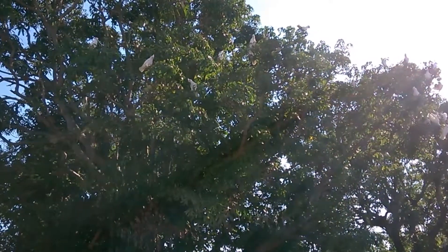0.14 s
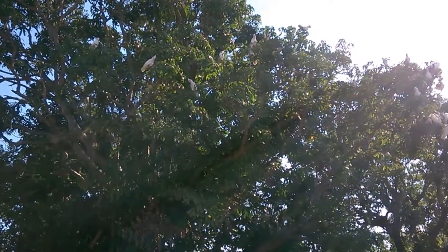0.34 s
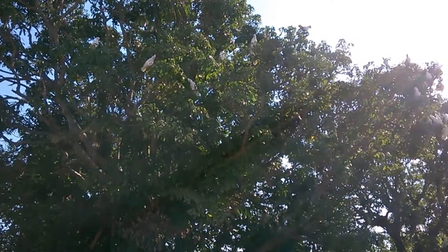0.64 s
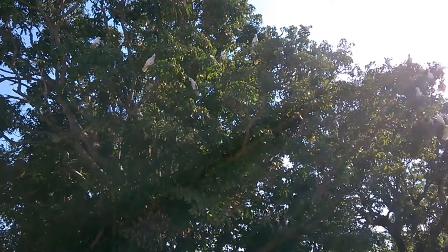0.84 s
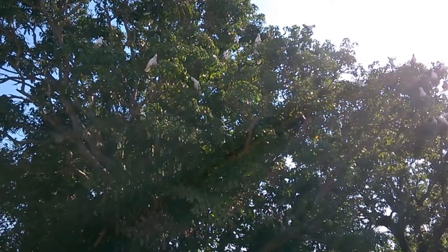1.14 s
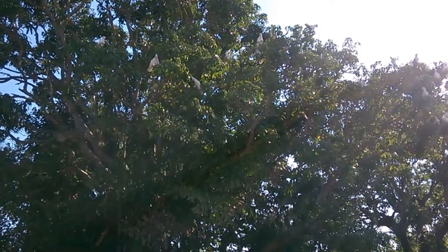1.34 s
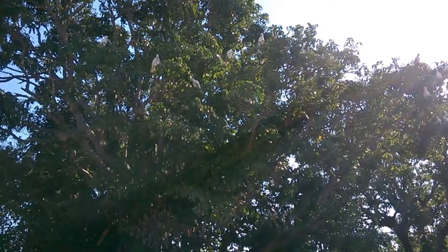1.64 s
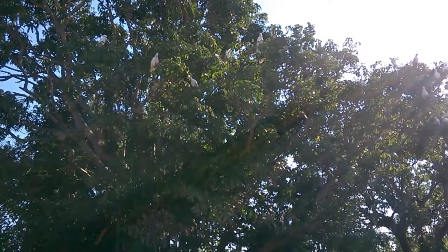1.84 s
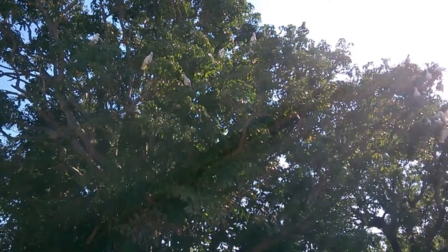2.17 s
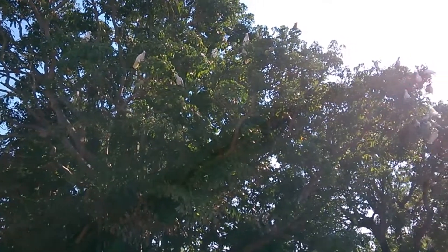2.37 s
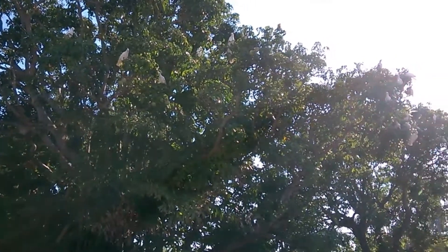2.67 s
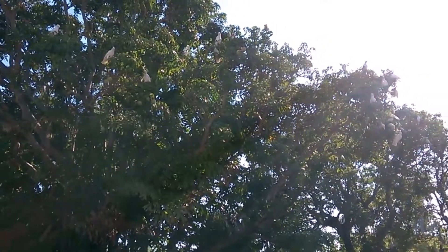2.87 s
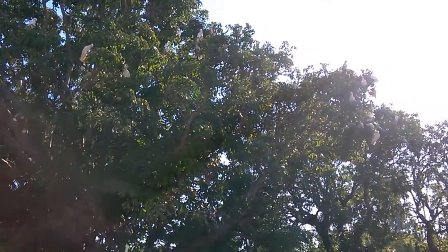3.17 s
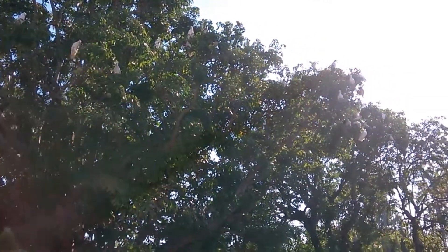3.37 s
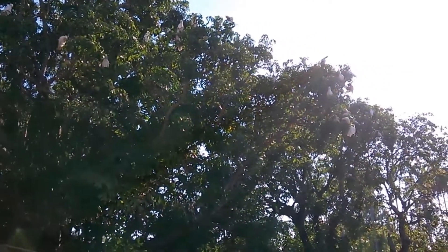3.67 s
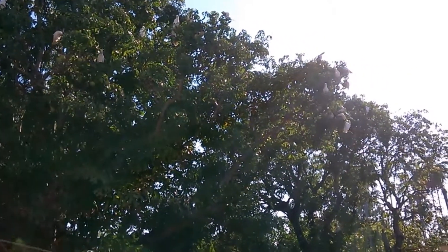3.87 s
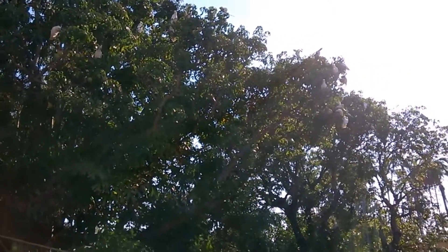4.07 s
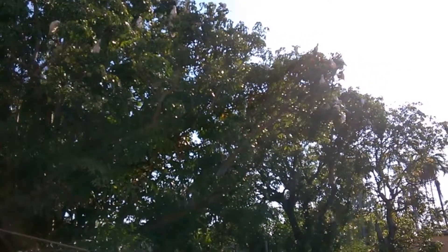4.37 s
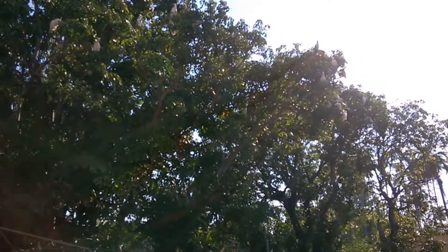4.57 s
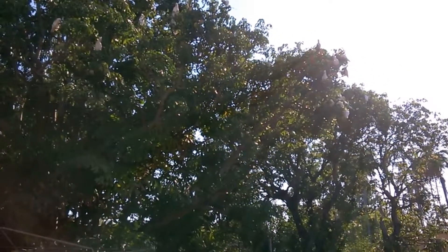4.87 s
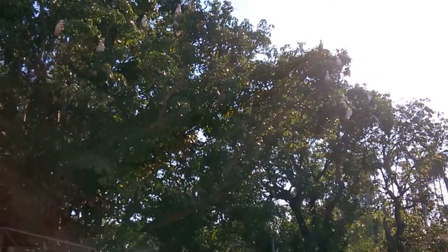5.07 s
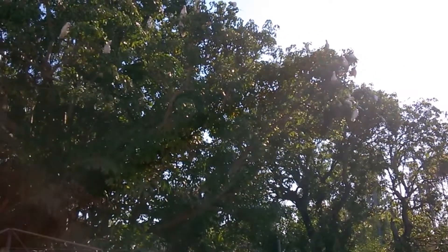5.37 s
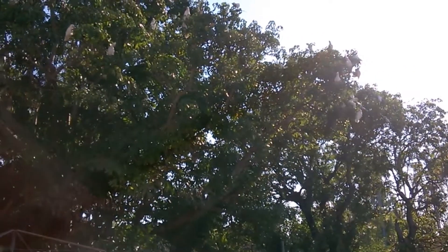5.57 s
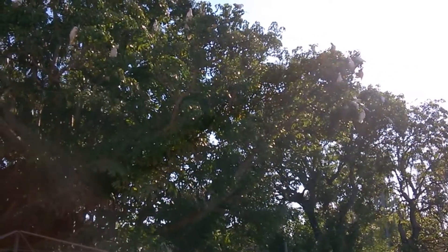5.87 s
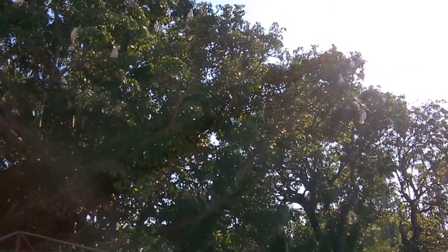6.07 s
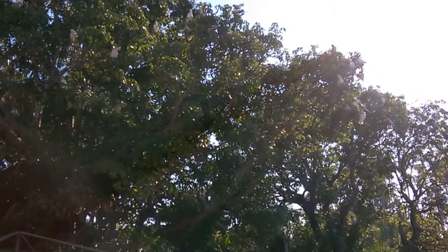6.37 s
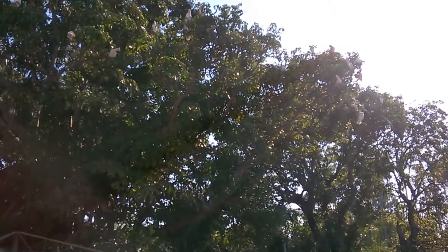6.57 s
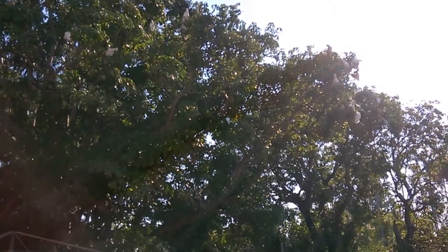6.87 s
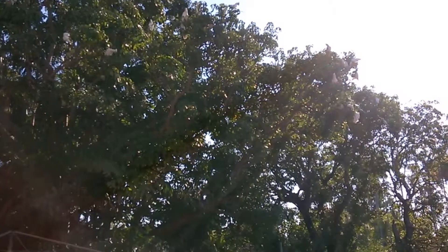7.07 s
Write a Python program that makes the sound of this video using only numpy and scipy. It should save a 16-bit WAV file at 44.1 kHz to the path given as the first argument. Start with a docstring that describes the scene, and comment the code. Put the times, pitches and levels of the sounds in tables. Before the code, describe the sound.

Outdoors among tall trees, wind rumbles low on the microphone while a distant engine drones and faint birds call far off. About three seconds in, a nearby cockatoo gives a short, hoarse screech, then a louder one a second later, each wavering in pitch and echoing briefly through the foliage. The engine hum slowly sinks and fades under a soft hiss of leaves and distant traffic.

```python
"""A cockatoo screeches twice from a tall tree: a membrane chops its breath into harsh harmonics,
the throat colours them, leaves and trunks scatter them back. Each screech is hoarse throughout,
swoops three times, swells and gains a slight undertone. Faint calls sound from further off.
Below, an engine drones and slowly drops in pitch, low hums come and go, wind rumbles on the
microphone, and swells from distant traffic and far birds pass under a hiss of leaves."""
import sys
import numpy as np
from scipy import signal
from scipy.fft import rfft, irfft
from scipy.io import wavfile
from scipy.ndimage import uniform_filter1d

SR = 44100
rng = np.random.default_rng(int(sys.argv[2]) if len(sys.argv) > 2 else 0)


def generate_wav(signal):
    """Clip the signal to [-1, 1] and save it as 16-bit WAV at the path in sys.argv[1]."""
    frames = np.transpose(np.atleast_2d(signal))
    scaled = np.clip(frames, -1, 1) * 32767
    pcm = np.round(scaled).astype(np.int16)
    wavfile.write(sys.argv[1], SR, pcm)


N = 318534


def cockatoo(attack_s=.018, attack_db=15.5, crescendo_s=.12, release_s=.038, release_db=17.5):
    """Two near, hoarse screeches: each opens dull, swells and gains a slight undertone."""
    # start_s, end_s, level_db, crescendo_db, early_roughness, late_roughness, tilt_db_per_oct,
    # shut_beak_db_per_oct, beak_opening_s, gape_shift_ratio, second_harmonic_db
    screeches = [(2.91, 3.15, -21.5, 9.9, 0.57, 0.6, 1.3, -14.5, 0.033, 0.032, 1),
                 (4.097, 4.377, -17, 7, 0.36, 0.3, 0.89, -7, 0.027, 0.0024, -2.5)]
    undertone_after_s, undertone_rise_s = .105, .015
    top_after_s, top_rise_s = .06, .027
    t = np.arange(N) / SR
    hz, height, push, flipping, accent_db, accent_tilt = warble()
    sounding, db, rough, doubling, beak_tilt, muffled, gape, second_db = np.zeros((8, N))
    for (start, end, level_db, crescendo_db, early_rough, late_rough,
         tilt, shut_tilt, opening_s, gape_shift, harmonic_db) in screeches:
        age = t - start
        near = np.abs(t - np.clip(t, start, end)) < .1
        late = near * ramp((age - undertone_after_s) / undertone_rise_s)
        sounding += (t > start) & (t < end)
        gape += near * gape_shift
        second_db += near * harmonic_db
        onset_db = attack_db * ramp(1 - age / attack_s) + crescendo_db * ramp(1 - age / crescendo_s)
        db += near * (level_db - onset_db - release_db * ramp(1 - (end - t) / release_s))
        rough += near * early_rough + (late_rough - early_rough) * late
        doubling += .3 * late_rough * late * (1 - height)
        beak_tilt += near * (tilt + shut_tilt * ramp(1 - age / opening_s))
        muffled += near * ramp(1 - (age - top_after_s) / top_rise_s)
    brightness = 1 - .5 * height + beak_tilt + accent_tilt  # duller on the crests
    trembling_hz = hz * (1 + .003 * wobble(70))
    rough += .17 * flipping
    voice = syrinx(trembling_hz, db + accent_db, rough, brightness, push, doubling, gape, second_db)
    # treble above 7 kHz, muted at the start of each screech: freq_hz, gain_db
    top_band = [(7200, 0), (12000, 0)]
    voice -= muffled * colour(voice, top_band)
    return voice * ring(hz) * uniform_filter1d(sounding, size=200)


def warble(crest_half_s=.012, bowl_share=.8, rise_power=1.35, fall_power=1.9):
    """The voice flips up onto each crest and sags in a bowl between, falling faster than it rises."""
    # three swoops a screech: crest_s, crest_hz, dip_s, dip_hz
    swoops = [(2.929, 812, 2.974, 712), (3.014, 803, 3.056, 652), (3.108, 740, 3.145, 730),
              (4.111, 800, 4.140, 655), (4.205, 813, 4.262, 684), (4.325, 793, 4.37, 776)]
    # push on each crest: accent_db, tilt_db_per_oct
    accents = [(-2, -3.5), (5, -2.5), (1, 0), (-2, -1.5), (4, 2), (1, 1.5)]
    t = np.arange(N) / SR
    crest_s, crest_hz, dip_s, dip_hz = np.transpose(swoops)
    crest = np.minimum(np.searchsorted(dip_s, t), len(swoops) - 1)
    dip = np.maximum(np.searchsorted(crest_s, t) - 1, 0)
    away_s = np.abs(t - crest_s[crest])
    flip = 1 / (1 + (away_s / crest_half_s) ** 6)
    power = np.where(t < crest_s[crest], rise_power, fall_power)
    bowl = bowl_share * ramp(1 - away_s / np.abs(dip_s[dip] - crest_s[crest])) ** power
    height = flip + (1 - flip) * bowl
    hz = dip_hz[dip] + (crest_hz[crest] - dip_hz[dip]) * height
    push = flip * (crest % 3 == 1)  # the middle crest is hardest
    flipping = np.sin(np.pi * flip)
    accent_db, accent_tilt = np.array(accents)[crest].T * flip
    return hz, height, push, flipping, accent_db, accent_tilt


def syrinx(hz, db, rough, tilt_db_per_oct, push, doubling, gape, second_db, harmonics=14):
    """A membrane beats in slightly uneven cycles and chops the air stream; the throat colours both."""
    pitch_hz = hz * (1 + .013 * rough * wobble(200))
    phase = 2 * np.pi * np.cumsum(pitch_hz) / SR
    # beats shut early or late, blurring the top harmonics into rasp
    beat = phase + .11 * rough * wobble(350)
    grid_hz = np.arange(N // 2 + 1) * SR / N
    relaxed, pushed = throat(grid_hz), throat(grid_hz, push=.93)
    tone, power = 0, 0
    for k in range(1, harmonics + 1):
        tilt_db = tilt_db_per_oct * np.log2(np.minimum(k * hz, 4500) / 2500)
        edge_db = 1.2 * (db + 15) * np.clip((k * hz - 6000) / 1500, 0, 1.5)  # top follows the level
        flicker_db = 2.8 * wobble(30)
        # a wider gape raises only the beak's resonances, above 3 kHz
        lookup_hz = k * hz / (1 + gape * ramp((k * hz - 3000) / 1000))
        passed = (1 - push) * np.interp(lookup_hz, grid_hz, relaxed)
        passed += push * np.interp(lookup_hz, grid_hz, pushed)
        weight = passed * undb(tilt_db + edge_db + flicker_db + (k == 2) * second_db)
        dispersion = 2 * np.pi * k * k / harmonics  # windpipe delays spread each beat
        tone += weight * np.cos(k * beat + dispersion)
        power += weight ** 2 / 2
    chopped = rng.standard_normal(N) * (1 + np.cos(phase))
    air_gain = relaxed * undb(2.5 * np.log2(np.clip(grid_hz, 500, 5500) / 2500))
    air = unit(irfft(rfft(chopped) * air_gain, N))
    # strain shakes the beats; doubling makes them alternately strong and weak
    flutter = 1 + .3 * rough * wobble(300) + 2 * doubling * np.cos(phase / 2)
    rasp = .38 * rough
    return undb(db) * (tone / np.sqrt(power) * flutter + rasp * air) / np.sqrt(1 + rasp ** 2)


def throat(hz, push=0, hollow_hz=2547, hollow_width_hz=32, hollow_db=-19.5):
    """Gain of windpipe and beak: resonances that move with push (0-1), and one antiresonance."""
    # centre_hz, width_hz, level_db, push_shift_hz, push_change_db
    resonances = [(655, 215, -8.5, 2, -3), (1400, 410, -10, -2, 3.5), (1570, 120, -3, 3, 1),
                  (2060, 400, -5.5, 2, -2), (2344, 284, 3.5, -3.5, 0), (2854, 150, 2, -1, -3),
                  (3440, 550, -2, -120, -4), (4115, 325, 2, 148, -4), (4724, 300, -8, 29, -3),
                  (5520, 630, -19.5, 4, 0), (6460, 1500, -23.5, 2, -14.5), (8400, 490, -23.5, 393, -15)]
    power = 0
    for centre_hz, width_hz, db, shift_hz, change_db in resonances:
        detuning = 2 * (hz - centre_hz - push * shift_hz) / (1.73 * width_hz)
        power += undb(db + push * change_db) ** 2 / (1 + detuning ** 2) ** 3
    return np.sqrt(power) * undb(hollow_db * np.exp(-((hz - hollow_hz) / hollow_width_hz) ** 2))


def ring(hz, harmonics=7, share=.62):
    """Gain near 1: the call rings out when a harmonic sits on a throat resonance."""
    pitches_hz = np.linspace(600, 900, 301)
    power = sum(throat(k * pitches_hz) ** 2 for k in range(1, harmonics + 1))
    return np.interp(hz, pitches_hz, unit(np.sqrt(power))) ** share


def trees(x, wet_db, low_t60_s=.53, high_t60_s=.33, build_s=.025):
    """Foliage scatters a dense tail whose treble dies first; trunks add single, duller echoes."""
    # ground, trunks and crowns: delay_s, level_db
    echoes = [(.0045, -12), (.016, -17.5), (0.066, -20), (.125, -25.5), (0.15, -31.5)]
    # what leaves and trunks send back: freq_hz, gain_db
    scatter = [(500, -21), (800, -1), (1550, -0.5), (2000, 0.5), (2400, -2), (3200, 3), (4100, -4.5),
               (4900, 4), (6000, -2.5), (8000, -14)]
    t = np.arange(SR) / SR
    low = butterworth(rng.standard_normal(SR), 4, 1900) * undb(-60 * t / low_t60_s)
    high = butterworth(rng.standard_normal(SR), 4, [1900, 6500], "band") * undb(-60 * t / high_t60_s)
    tail = (low + high) * (1 - np.exp(-t / build_s))
    trunks = np.zeros(SR)
    for delay_s, db in echoes:
        trunks[int(delay_s * SR)] += undb(db)
    response = undb(wet_db) * tail / np.sqrt(np.sum(tail ** 2)) + butterworth(trunks, 2, 2500)
    return x + colour(signal.fftconvolve(x, response)[:N], scatter)


def far_calls_and_echo(cutoff_hz=3800):
    """Far calls, and one dull late echo of the second screech at 4.5 s; distance takes the top off."""
    # start_s, length_s, start_hz, end_hz, level_db, roughness, harmonics
    glides = [(0.247, 0.25, 1690, 1717, -52, 0.3, 1), (0.515, 0.12, 3820, 3610, -50, 0.7, 1),
              (0.62, 0.32, 1832, 1918, -51.5, 0.16, 1), (0.569, .4, 1308, 1290, -52.5, 0.3, 1),
              (0.5, 0.4, 1550, 1504, -49, 0.9, 1), (0.872, 0.48, 1394, 1330, -53.5, .6, 1),
              (1.0, 0.3, 1860, 1925, -52, 0.54, 1), (1.5, .22, 1480, 1400, -54, .9, 1),
              (1.54, .16, 2193, 1973, -47, 1.1, 1), (1.89, 0.094, 2125, 2170, -41, 0.85, 1),
              (2.25, .13, 1250, 1180, -47, 0.9, 1), (2.46, 0.12, 930, 873, -48, 0.9, 1),
              (4.515, 0.046, 1600, 1560, -48.5, 0.3, 1), (5.025, 0.27, 1380, 1237, -58, 0.87, 1),
              (6.172, 0.055, 4160, 4040, -46, 0.35, 1), (6.198, 0.084, 3450, 2930, -49.5, .8, 1),
              (6.233, 0.12, 3800, 3414, -48.5, 0.82, 1), (6.304, .035, 1300, 1273, -46, 0.83, 2),
              (6.426, 0.082, 670, 652, -44.5, 0.7, 8.6), (6.436, 0.032, 3276, 3310, -42.5, 0.17, 1),
              (6.463, 0.057, 1987, 1954, -48, 0.26, 1), (6.93, 0.268, 900, 874, -45, 0.64, 1),
              (6.99, 0.222, 1220, 1196, -48, .9, 1)]
    out = np.zeros(N)
    jitter, quaver = .1 * wobble(250), .012 * wobble(18)
    for start_s, length_s, start_hz, end_hz, db, rough, harmonics in glides:
        span = slice(int(start_s * SR), int(start_s * SR) + int(length_s * SR))
        size = len(out[span])
        hz = np.linspace(start_hz, end_hz, size)
        phase = 2 * np.pi * np.cumsum(hz * (1 + rough * jitter[span] + quaver[span])) / SR
        tone = sum(throat(k * hz) ** .5 * np.sin(k * phase) for k in range(1, round(harmonics) + 1))
        out[span] += unit(tone * np.hanning(size) ** .5) * undb(db)
    return butterworth(out, 1, cutoff_hz)


def engine(waver_db=.7):
    """A distant exhaust drone that wavers on its way through moving air."""
    # time_s, firing_hz
    speed = [(0, 91.45), (1, 92.05), (2, 90.56), (3, 89), (3.8, 89.3), (4.3, 86.26), (5.1, 84.94),
             (6.2, 84.7), (7.2, 84.1)]
    # time_s, level_db
    levels = [(0, -56), (.35, -32), (1.95, -30), (2.85, -21), (4.25, -25.5), (4.95, -28.5), (5.45, -25.5),
              (6.2, -31), (6.75, -43), (7.22, -40)]
    # brief dips in level: centre_s, half_length_s, depth_db
    fades = [(0.716, 0.11, 14.5), (1.285, 0.088, 6), (2.683, 0.073, 3.5), (3.097, 0.11, 6.5),
             (4.644, 0.19, 16)]
    # firing_multiple, level_db
    orders = [(.5, -24), (1, 0), (2, -23.5)]
    fade_db = sum(depth_db * bell(centre_s, half_s) for centre_s, half_s, depth_db in fades)
    phase = 2 * np.pi * np.cumsum(curve(speed) * (1 + .0041 * wobble(7.1))) / SR
    drone = sum(undb(db + 3.1 * (k != 1) * wobble(1.7)) * np.sin(k * phase) for k, db in orders)
    return unit(drone) * undb(curve(levels) - fade_db + waver_db * wobble(10))


def hums(waver_db=3.5):
    """Faint low hums that swell and fade, including the engine's octave."""
    # start_s, end_s, pitch_hz, level_db
    tones = [(0, 1.6, 197, -44.5), (3.302, 3.9, 113.3, -34), (3.5, 4.53, 174.8, -43),
             (4.852, 5.29, 100, -36.5), (5.2, 8.3, 158.7, -45.5), (4.9, 8.9, 421.7, -56.5),
             (4.999, 8.5, 600, -59.5), (5.802, 12.8, 874, -47.5)]
    t = np.arange(N) / SR
    out = 0
    for start_s, end_s, hz, db in tones:
        swell = np.sqrt(np.abs(np.sin(np.pi * ramp((t - start_s) / (end_s - start_s)))))
        drift = .01854 * np.sqrt(200 / hz) * wobble(20)
        phase = 2 * np.pi * np.cumsum(hz * (1 + drift)) / SR
        out += np.sqrt(2) * np.sin(phase) * swell * undb(db + waver_db * wobble(8.7))
    return out


def wind(buffet_db=-43, rumble_db=-42):
    """Wind on the microphone: deep buffeting and a rumble above it, both lifted by gusts."""
    # peak_s, half_length_s, buffet_db, rumble_db
    gusts = [(.2, 0.15, -39, -50), (1.12, 0.41, -41, -40.5), (1.67, 0.44, -32.5, -38),
             (2.55, 0.62, -35, -38.5), (3.65, 0.75, -36, -36), (5.5, 0.27, -38, -40.5),
             (6.95, 0.19, -56, -42.5)]
    # spectra: freq_hz, gain_db
    buffet_spectrum = [(15, -14), (25, -17), (33, -17), (42, -2), (50, -2.5), (65, -2.5), (85, -10),
                       (120, -33), (250, -63)]
    rumble_spectrum = [(60, -24), (95, 1.5), (115, -1.5), (140, 0), (175, -6), (210, -9.5), (260, -17.5),
                       (400, -29.5), (800, -69)]
    buffet_gusts, rumble_gusts = swelling(gusts)
    buffet = noise(buffet_spectrum) * np.hypot(undb(buffet_db), buffet_gusts)
    rumble = noise(rumble_spectrum) * np.hypot(undb(rumble_db), rumble_gusts)
    return (buffet + rumble) * undb(wobble(3.033))


def surroundings(air_db=-47, hiss_floor_db=-55, flutter_db=1.1):
    """Air of leaves and far town; distant swells of roar, swish and hiss from traffic and far birds."""
    # peak_s, half_length_s, roar_db, swish_db, hiss_db
    swells = [(.68, 0.25, -67, -51, -48), (1.12, 0.43, -53, -47, -53), (1.58, 0.37, -47.5, -48.5, -45.5),
              (2.12, 0.28, -48, -45, -42.5), (2.65, 0.42, -43, -49.5, -45), (3.75, 0.6, -48, -52, -48),
              (5.22, 0.22, -57, -46.5, -61), (6.6, 0.36, -43.5, -57, -68.5), (7.17, 0.22, -43, -48, -73.5)]
    # spectra: freq_hz, gain_db
    air_spectrum = [(150, -5.5), (280, 2.5), (360, -0.5), (420, 4), (510, -2.5), (650, 1.5), (1000, 1.5),
                    (1900, -1.5), (2400, -19), (2900, -16.5), (3800, -4.5), (4300, -11), (4900, -15),
                    (5500, -21), (6000, -43)]
    roar_spectrum = [(250, -12.5), (430, -9.5), (520, -13.5), (700, -9), (880, -4), (1100, -7.5),
                     (1600, -29), (3000, -50.5)]
    swish_spectrum = [(600, -24.5), (1000, -3.5), (1300, 3.5), (1800, -3), (2300, -22.5), (3500, -31.5)]
    hiss_spectrum = [(1200, -9.5), (2100, 0), (2800, -5.5), (3800, -3.5), (4300, -6), (5000, -21),
                     (5600, -33.5), (6000, -54)]
    roar, swish, hiss = swelling(swells)
    hiss = np.hypot(hiss, undb(hiss_floor_db))
    out = noise(air_spectrum) * undb(air_db + .8 * wobble(2.2))
    for spectrum, gain in ((roar_spectrum, roar), (swish_spectrum, swish), (hiss_spectrum, hiss)):
        out += noise(spectrum) * gain * undb(flutter_db * wobble(7))
    return out


def undb(db):
    """Decibels to gain."""
    return 10 ** (np.asarray(db) / 20)


def unit(x):
    """Scale to rms 1."""
    return x / np.sqrt(np.mean(x ** 2) + 1e-18)


def ramp(x):
    """Rise from 0 to 1 and hold."""
    return np.clip(x, 0, 1)


def curve(table):
    """Straight lines through (time_s, value) rows."""
    return np.interp(np.arange(N) / SR, *np.transpose(table))


def bell(peak_s, half_s):
    """Smooth rise to 1 and fall."""
    return np.exp(-((np.arange(N) / SR - peak_s) / half_s) ** 2)


def swelling(table):
    """Gain curves of swells whose powers add, one per dB column."""
    return np.sqrt(sum(np.outer(undb(db) ** 2, bell(peak_s, half_s)) for peak_s, half_s, *db in table))


def wobble(hz):
    """Random motion of rms 1, no faster than hz."""
    knots = rng.standard_normal(int(2 * hz * N / SR) + 4)
    smooth = signal.resample_poly(knots, 16, 1)
    return unit(np.interp(np.arange(N) * 32 * hz / SR, np.arange(len(smooth)), smooth))


def butterworth(x, order, hz, kind="low"):
    """Causal filter with a flat passband."""
    return signal.sosfilt(signal.butter(order, hz, kind, fs=SR, output="sos"), x)


def colour(x, spectrum, skirt_db_per_oct=60):
    """Filter by (freq_hz, gain_db) rows, falling steeply past the ends."""
    hz, db = np.transpose(spectrum)
    points = np.log2(hz)
    octave = np.log2(np.maximum(np.arange(N // 2 + 1) * SR / N, 1))
    outside = np.abs(octave - np.clip(octave, points[0], points[-1]))
    return irfft(rfft(x) * undb(np.interp(octave, points, db) - skirt_db_per_oct * outside), N)


def noise(spectrum):
    """Coloured noise of rms 1."""
    return unit(colour(rng.standard_normal(N), spectrum))


def scene():
    """Birds in the trees over the outdoor background, mono."""
    birds = trees(cockatoo(), wet_db=-10.5) + trees(far_calls_and_echo(), wet_db=-11)
    return (birds + engine() + hums() + wind() + surroundings())[None]


def record(dry):
    """Round the highest peaks and cut the top."""
    ceiling, cutoff_hz = .85, 10200
    rounded = dry / (1 + (dry / ceiling) ** 6) ** (1 / 6)
    return signal.sosfilt(signal.ellip(8, .2, 70, cutoff_hz, fs=SR, output="sos"), rounded)


dry = scene()
out = record(dry)
generate_wav(out)
```